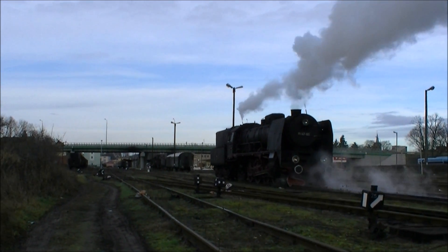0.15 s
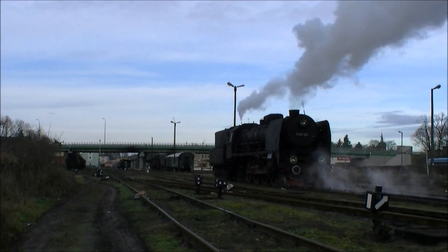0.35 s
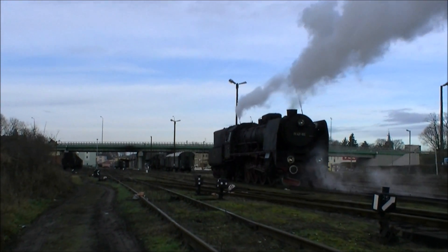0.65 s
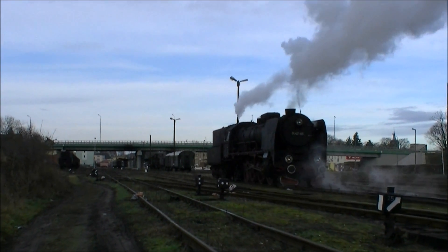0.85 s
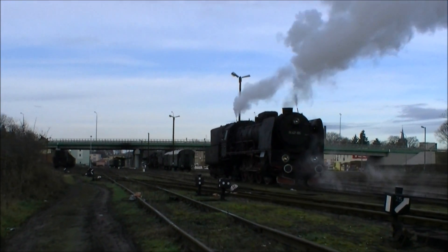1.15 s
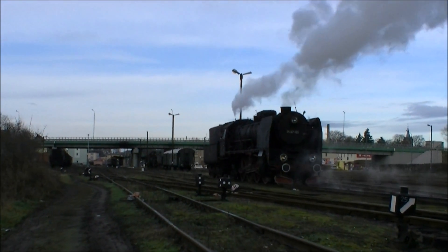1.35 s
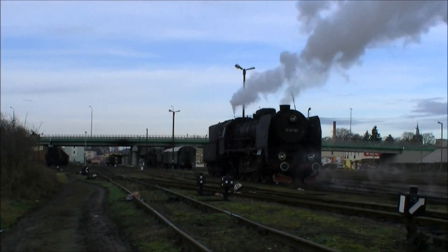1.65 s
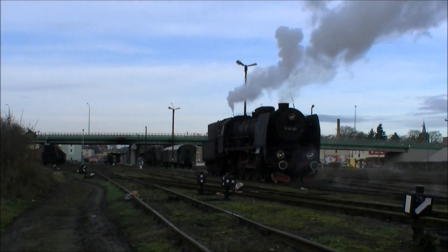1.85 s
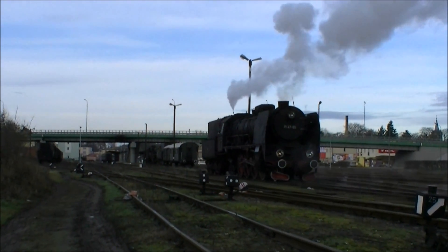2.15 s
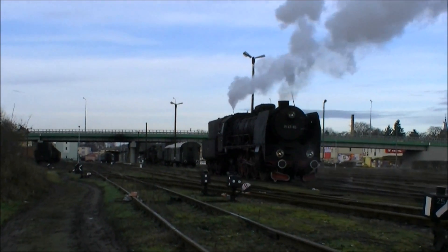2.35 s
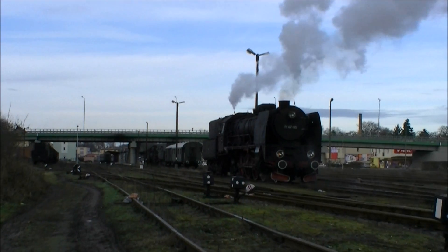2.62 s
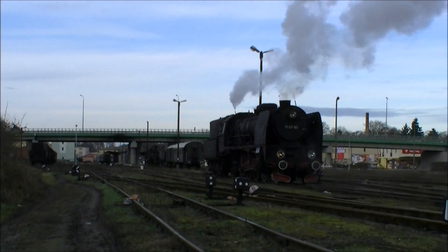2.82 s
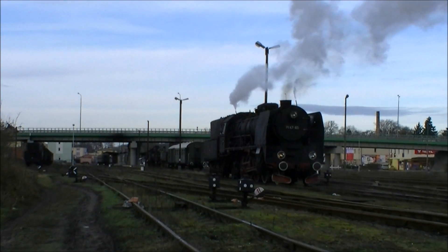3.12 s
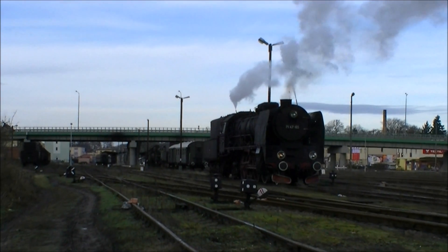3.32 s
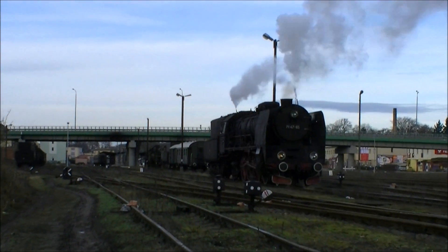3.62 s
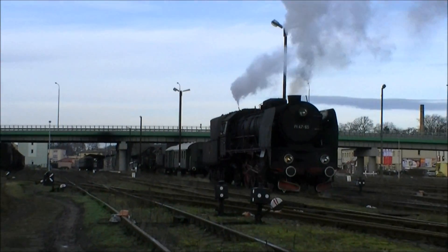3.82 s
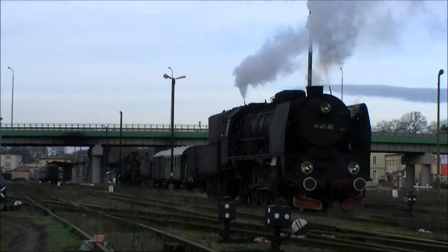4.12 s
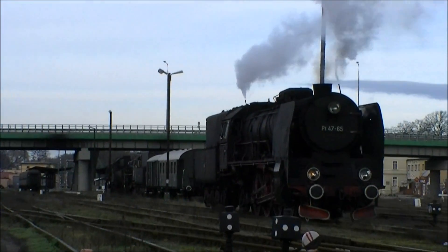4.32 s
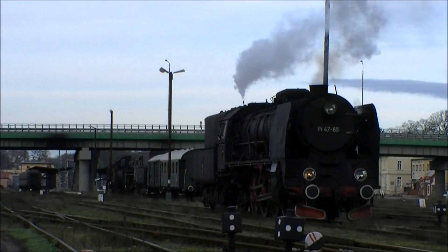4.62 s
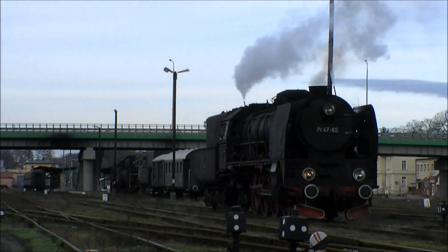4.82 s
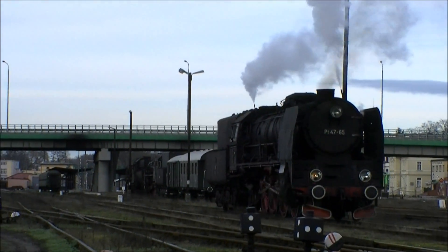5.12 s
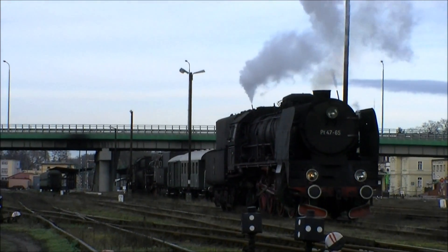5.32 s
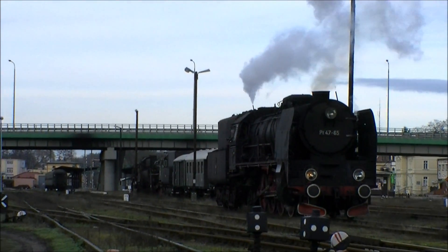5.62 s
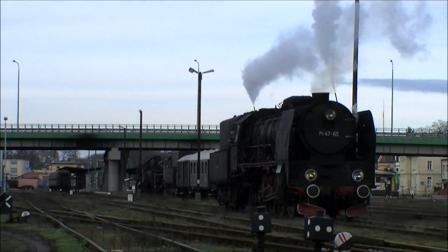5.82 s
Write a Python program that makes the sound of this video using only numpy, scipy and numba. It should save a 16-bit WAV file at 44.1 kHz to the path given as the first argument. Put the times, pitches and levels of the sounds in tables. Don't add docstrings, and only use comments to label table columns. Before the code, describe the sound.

An open rail yard, heard by a camera some tens of metres from a slowly rolling steam locomotive. Steam jets dominate: loud, bright, crackling bursts that snap open in about a hundredth of a second, last one or two tenths, and fade through a lower roar. They come near 0.05, 0.7, a pair at 1.65 and 1.8, 2.45, a pair at 3.35 and 3.5, 4.1, a pair at 5.05 and 5.15, and 5.85 seconds. Between them a steady airy leak hisses, its treble slowly softening, with a thin wavering whine around 4.4 kilohertz. A breathy draught tone grows later. Small metallic clicks fall near 1.6, 3.05, 3.9, 4.35 (strongest, left) and 4.5, then a soft rail-joint thump at 4.85. Low town rumble lies far beneath. Each jet ducks the background, which swells back; a faint dull tail returns from wagons and sheds.

```python
import sys
import numpy as np
from scipy import signal
from scipy.fft import rfft, irfft, next_fast_len
from scipy.io import wavfile
from numba import njit

SR = 44100
rng = np.random.default_rng(int(sys.argv[2]) if len(sys.argv) > 2 else 0)


def boost_factor(decibels):
    exponent = np.asarray(decibels, float) / 20
    return 10 ** exponent


def master(y):
    cut = np.clip(np.atleast_2d(y).T, -1, 1)
    pcm = np.round(cut * 32767)
    wavfile.write(sys.argv[1], SR, pcm.astype(np.int16))


N = 262836
SIZE = next_fast_len(N)
HZ = np.maximum(np.arange(SIZE // 2 + 1) * SR / SIZE, 1)
T = np.arange(N) / SR


def to_rms(x, db):
    return x * boost_factor(db) / np.sqrt(np.mean(x ** 2))


def on_log_hz(table):
    hz, value = np.transpose(table)
    return np.interp(np.log(HZ), np.log(hz), value)


def over_time(table):
    return np.interp(T, *np.transpose(table))


def walk(rate_hz):
    knots = rng.standard_normal(4000)
    return np.interp(T * rate_hz, np.arange(len(knots)), knots)


def noise(gain):
    # frequency in Hz, level in dB.
    spread = [(40, -7), (125, -17), (250, -10), (500, -11), (1000, -21.5), (2000, -17), (4000, -18.5),
              (6500, -17.5), (8500, -13), (10500, -13), (12000, -23)]
    shares = np.array([np.ones(len(HZ)), boost_factor(on_log_hz(spread))])
    return rfft(rng.standard_normal((2, SIZE))) * gain * shares


def band(spectrum, lo_hz, hi_hz):
    def above(hz):
        return np.clip(0.5 + 3 * np.log2(HZ / hz), 0, 1)
    return irfft(spectrum * (above(lo_hz) - above(hi_hz)), SIZE)[..., :N]


def turbulent(colour, lo_hz, hi_hz, rate_hz, patchy_db, count):
    spectrum = noise(boost_factor(on_log_hz(colour)))
    edges_hz = np.geomspace(lo_hz, hi_hz, count + 1)
    direct = np.zeros(N)
    for a, b in zip(edges_hz, edges_hz[1:]):
        direct += boost_factor(patchy_db * walk(rate_hz)) * band(spectrum[0], a, b)
    diffuse = band(spectrum[1], lo_hz, hi_hz)
    return np.array([direct, diffuse]) / np.std(direct)


def breathy(hz, width_hz):
    resonance = 1 / (1 + (2 * (HZ - hz) / width_hz) ** 2)
    out = irfft(noise(resonance), SIZE)[:, :N]
    return out / np.std(out[0])


def town():
    # frequency in Hz, density in dB per Hz.
    colour = [(15, -49), (25, -28), (46, -9), (130, 0.5), (172, 4), (256, -4.5), (413, -2), (466, 0),
              (505, 1), (600, -28), (780, -34), (1320, -120)]
    rumble = turbulent(colour, 12, 480, rate_hz=6.1, patchy_db=-1.5, count=7)
    return boost_factor(-51.5) * rumble + boost_factor(-79) * breathy(152, 11)


def knocks():
    # start in seconds, peak in dB, ring in Hz, brightness in dB,
    # left minus right in dB.
    clicks = [
        (1.596, -16.5, 2590, -13, -1),
        (3.046, -18.5, 2360, -6, 0),
        (3.8894, -32, 4500, -6, 5),
        (4.35, -12.5, 3200, -5, 13),
        (4.522, -25, 2560, -11, 2),
    ]
    # start in seconds, peak in dB, pitch in Hz, decay (T60) in seconds.
    thumps = [
        (4.751, -41, 148, .15),
        (4.842, -33, 174, 0.089),
        (4.843, -41, 420, 0.056),
    ]
    out = np.zeros((2, N))
    grit = rng.standard_normal((len(clicks), 4000))
    t = np.arange(4000) / SR
    spit_sos = signal.butter(3, [4000, 10500], "band", fs=SR, output="sos")
    for (start_s, db, hz, bright_db, pan_db), g in zip(clicks, grit):
        t60_s = 0.04 * np.exp(-0.051 * (bright_db + 12))
        ring_sos = signal.butter(2, [0.62 * hz, 1.57 * hz], "band", fs=SR, output="sos")
        ring = to_rms(signal.sosfilt(ring_sos, g), 0)
        spit = to_rms(signal.sosfilt(spit_sos, g), bright_db)
        attack = np.minimum(t / (0.057 * t60_s), 1)
        decay = 1000.0 ** (-t / max(t60_s, 0.005))
        click = attack * decay * boost_factor(db + 1.0) * (ring + spit)
        k = int(start_s * SR)
        out[:, k:k + len(t)] += click * [[1], [np.tanh(pan_db / 17.4)]]
    for start_s, db, hz, t60_s in thumps:
        after_s = np.maximum(T - start_s, 0)
        shape = np.minimum(after_s / 0.0044, 1) * 1000.0 ** (-after_s / t60_s)
        out[0] += boost_factor(db) * np.sin(2 * np.pi * hz * after_s) * shape
    return out


def turbine():
    # pitch in Hz, width in Hz, level in
    # dB.
    tones = [
        (1105, 90, -48),
        (2210, 50, -47),
        (3230, 100, -52),
        (4335, 25, -50),
        (4410, 220, -46),
        (13150, 90, -70),
    ]
    # time in seconds, level in dB.
    draught_db = [(0, -64), (2, -48), (3.4, -45.5), (4, -40), (4.7, -48.5), (5, -37), (5.5, -40),
                  (5.96, -39.5)]
    blades = sum(boost_factor(db + 1.5 * walk(6)) * breathy(hz, width_hz) for hz, width_hz, db in tones)
    whine_hz = 4436
    phase = 2 * np.pi * whine_hz * T + 0.56 * walk(25)
    whine = boost_factor(-41.0 - 0.5 * T + 1.6 * walk(12)) * np.sin(phase) * [[1], [0.1]]
    draught = boost_factor(over_time(draught_db)) * breathy(1460, 160)
    return boost_factor(-3.0) * blades + whine + draught


def leak():
    # frequency in Hz, density in dB per Hz.
    colour = [(180, -46), (300, -28), (411, -11.5), (601, -13.5), (1110, -3.5), (1470, -2.5), (1650, -7.5),
              (2260, 1), (2750, 1.5), (4450, -3.5), (5800, -13), (7940, -8.5), (11200, -25), (13500, -31),
              (15600, -47)]
    # time in seconds, flow in dB.
    flow = [(0, -3), (.36, -1), (.5, 1), (.62, -.5), (1.0, 1.5), (1.15, .5), (1.3, 3), (2.05, 1), (2.25, 0),
            (2.4, 1.5), (2.95, -0.5), (3.3, 2), (3.9, -1.5), (4.08, 0), (4.45, -1), (4.75, -2), (5.5, 0.5),
            (5.96, 3)]
    # time in seconds, level in dB.
    squeal_db = [(0, -53), (.5, -48), (1.4, -45), (2.1, -59), (2.25, -46.5), (2.9, -46.5), (3.4, -55),
                 (4.5, -56), (5.96, -59)]
    # level in dB, dB per dB of flow, drift in dB per second as the engine turns.
    low_leak = (-36.5, 0.66, -0.46)
    middle_leak = (-33.5, 1.1, -.8)
    high_leak = (-32.5, 1, -1.4)
    flow_db = over_time(flow)

    def strength(row):
        db, per_flow_db, drift_db_per_s = row
        return boost_factor(db + per_flow_db * flow_db + drift_db_per_s * T)

    out = strength(low_leak) * turbulent(colour, 445, 1977, rate_hz=18, patchy_db=-1.3, count=6)
    out += strength(middle_leak) * turbulent(colour, 1930, 4900, rate_hz=14, patchy_db=0.5, count=6)
    out += strength(high_leak) * turbulent(colour, 4960, 14700, rate_hz=18, patchy_db=1.5, count=5)
    out += boost_factor(over_time(squeal_db)) * boost_factor(-1.5 + 1.4 * walk(14)) * breathy(11040, 490)
    return out * boost_factor(0.77 * walk(250))


def ground(x):
    # time in seconds, delay in ms.
    delay_ms = [(0, 0.78), (1.7, 0.67), (3.4, 0.648), (4.1, 0.605), (5.96, 0.55)]
    dull = signal.sosfilt(signal.butter(1, 5000, fs=SR, output="sos"), x)
    echo_time_s = T - over_time(delay_ms) / 1000
    echo = np.array([np.interp(echo_time_s, T, row) for row in dull])
    return x - 0.28 * echo


def yard(x):
    t60_s, delay_s, tail_db = 0.95, 0.15, -21
    t = np.arange(SR) / SR
    shape = np.clip(t / delay_s, 0, 1) ** 2 * 1000.0 ** (-t / t60_s)
    tail = rng.standard_normal((2, SR)) * shape
    tail = signal.sosfilt(signal.butter(1, 4000, fs=SR, output="sos"), tail)
    tail /= np.sqrt(np.sum(tail[0] ** 2))
    return signal.fftconvolve(x[None], tail, axes=1)[:, :N] * boost_factor([[tail_db], [tail_db - 6.5]])


def valves():
    # start in seconds, peak in dB,
    # time open in seconds, pressure sag while open in dB, first slug of water in dB.
    openings = [(0.043, -13.5, 0.071, 1.5, 1), (0.689, -13, .14, 8, 6.5), (1.657, -13, 0.049, -1, 6),
                (1.784, -12, 0.12, 11, 3.5), (2.445, -10.5, .15, 11.5, 8.5), (3.358, -14, .05, 3, 5),
                (3.48, -13.5, 0.12, 6.5, -5), (4.117, -13, .12, 4.5, 8.5), (5.027, -11, 0.054, 3, 7),
                (5.156, -11, 0.13, 11.5, 1), (5.842, -12, 0.093, 1.5, 1.5), (0.125, -28, 0.084, 4.5, 0),
                (4.975, -49, 0.069, -10, 0), (5.09, -32.5, 0.063, 4, -6)]
    snap_s, snap_db = 0.0088, 27
    swell_s, swell_db = 0.011, 3.5
    shut_db = 31
    pop_s = 0.0097
    linger_db = 18.5
    gain = np.zeros((3, N))
    for start_s, peak_db, open_s, sag_db, slug_db in openings:
        t = T - start_s
        fall_db = np.interp(t, [swell_s, open_s, 4 * open_s], [0, sag_db, sag_db + 3 * shut_db])
        rise_db = np.interp(t, [0, snap_s, swell_s], [-snap_db, -swell_db, 0])
        on = (t > 0) * (t < 4 * open_s) * boost_factor(peak_db + rise_db)
        pop_db = slug_db * np.exp(-np.clip(t - snap_s, 0, 1) / pop_s)
        lag_db = np.minimum(fall_db, linger_db)
        gain[0] += on * boost_factor(-fall_db)
        gain[1] += on * boost_factor(-5.5 + 0.27 * pop_db + 0.32 * lag_db - fall_db)
        gain[2] += on * boost_factor(-11.5 + pop_db + 0.65 * lag_db - fall_db)
    return gain


def jets():
    # frequency in Hz, density in dB per Hz.
    colour = [(150, -50), (300, -28), (500, -25.5), (800, -13), (1200, -8), (2000, -9.5), (3000, -4),
              (4200, 1.5), (5900, -2.5), (7700, 3.5), (9500, -5), (11900, -15.5), (14000, -23.5),
              (16000, -29)]
    hiss_gain, rush_gain, roar_gain = valves()
    eddies = boost_factor(0.85 * walk(300) + 0.84 * walk(50))
    hiss = turbulent(colour, 4260, 14300, rate_hz=19, patchy_db=2.4, count=6)
    rush = turbulent(colour, 2840, 4540, rate_hz=23, patchy_db=3.5, count=5)
    roar = turbulent(colour, 325, 3060, rate_hz=15, patchy_db=2.5, count=8)
    jet = boost_factor(5.5) * hiss_gain * hiss
    jet += boost_factor(3.0) * rush_gain * rush
    jet += boost_factor(5.5) * roar_gain * roar
    jet *= eddies
    return jet * boost_factor([[0], [-3]]) + yard(jet[0])


def scene():
    # frequency in Hz, lead of the left port in radians.
    port_phase = [(0, 0), (7840, -0.12), (8610, -0.48), (9390, -0.3), (15300, 0.0)]
    direct, diffuse = ground(jets() + leak()) + turbine() + knocks() + town()
    turn = np.exp(0.5j * on_log_hz(port_phase))
    spectrum = rfft(direct, SIZE)
    left = irfft(spectrum * turn, SIZE)[:N]
    right = irfft(spectrum / turn, SIZE)[:N]
    return np.array([boost_factor(-0.46) * (left + diffuse), boost_factor(-0.3) * (right - diffuse)])


@njit
def follow(x, attack, release):
    e, y = 0.0, np.empty(len(x))
    for i in range(len(x)):
        e += (x[i] - e) * (attack if x[i] > e else release)
        y[i] = e
    return y


def band_limit(x):
    return signal.sosfilt(signal.butter(12, 15800, fs=SR, output="sos"), x)


def record(dry):
    attack_s, release_s, threshold_db = 0.0032, 0.12, -20.5
    loud = follow(np.abs(dry).mean(axis=0), 1 / (attack_s * SR), 1 / (release_s * SR))
    gain = np.minimum(1, (boost_factor(threshold_db) / (loud + 1e-9)) ** 0.31)
    return band_limit(np.clip(dry * gain, -1, 1))


dry = scene()
out = record(dry)
master(out)
```